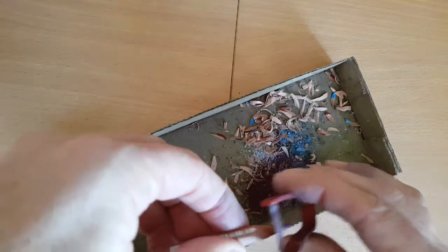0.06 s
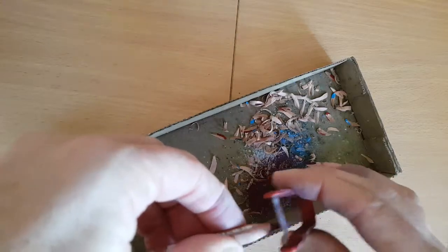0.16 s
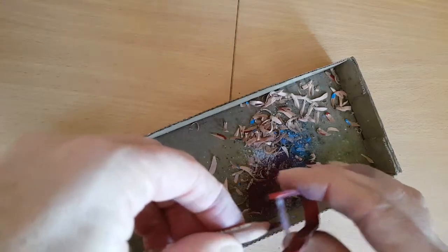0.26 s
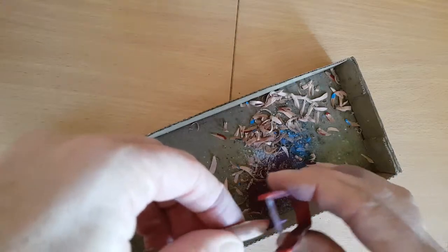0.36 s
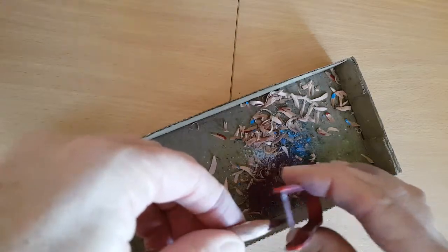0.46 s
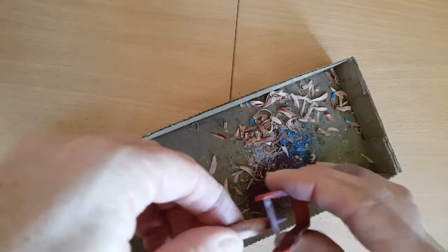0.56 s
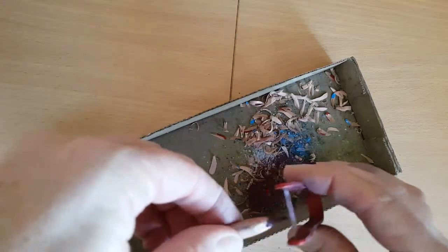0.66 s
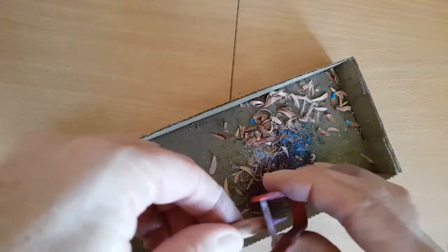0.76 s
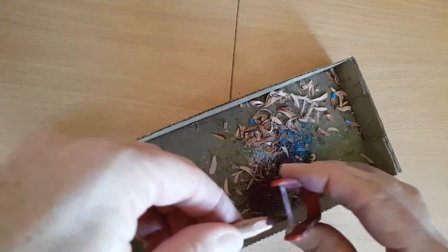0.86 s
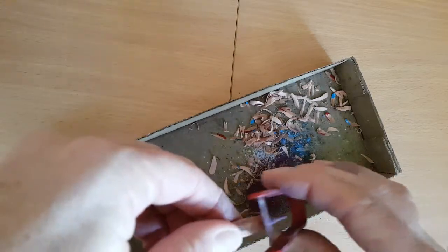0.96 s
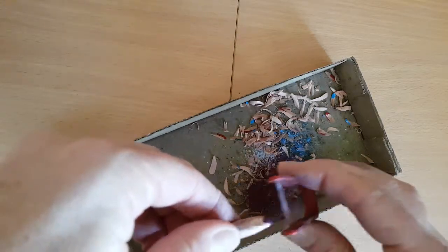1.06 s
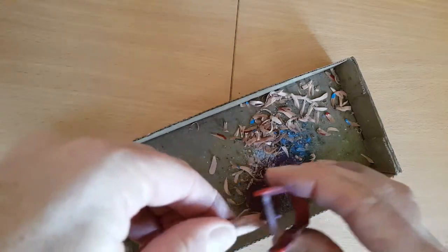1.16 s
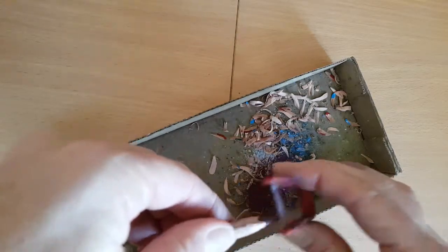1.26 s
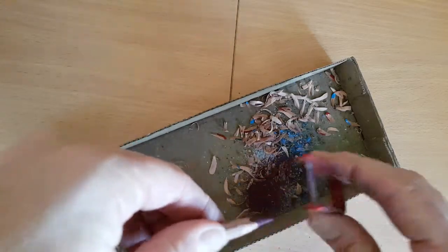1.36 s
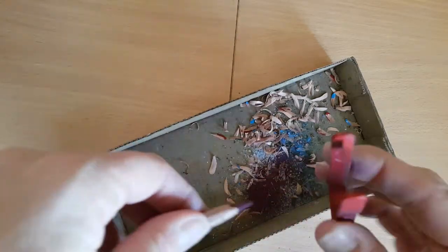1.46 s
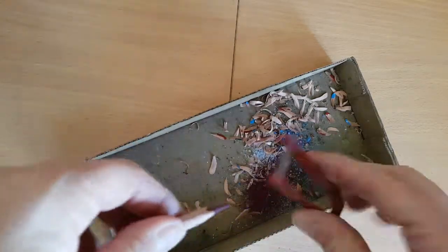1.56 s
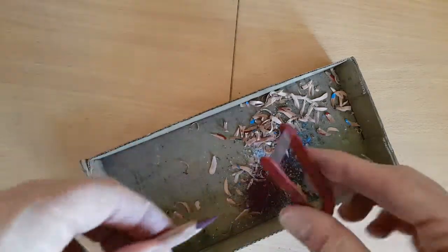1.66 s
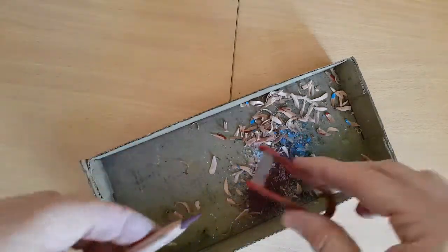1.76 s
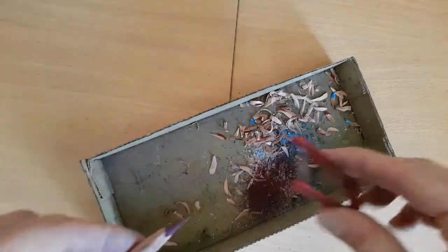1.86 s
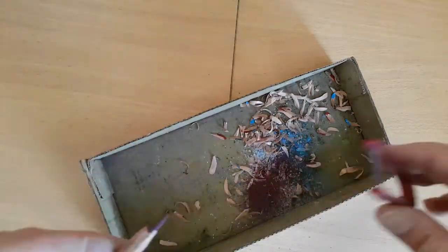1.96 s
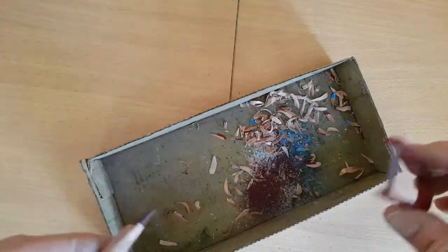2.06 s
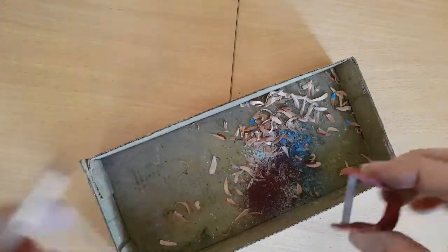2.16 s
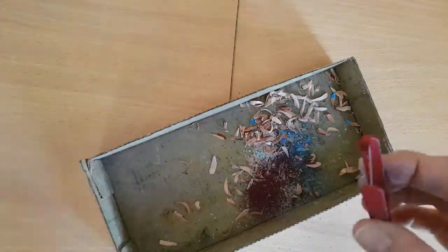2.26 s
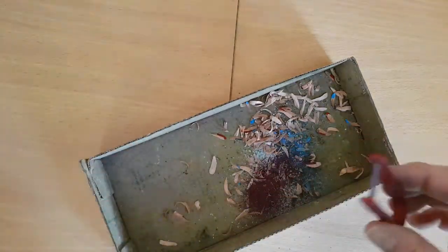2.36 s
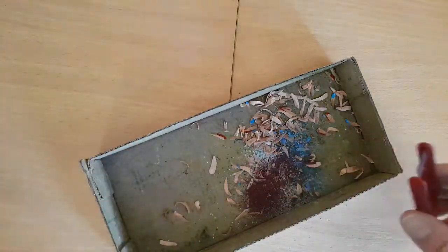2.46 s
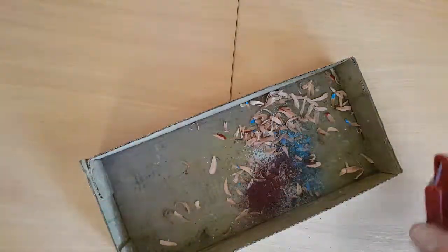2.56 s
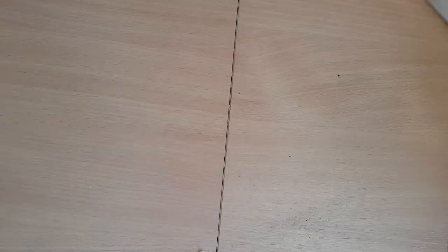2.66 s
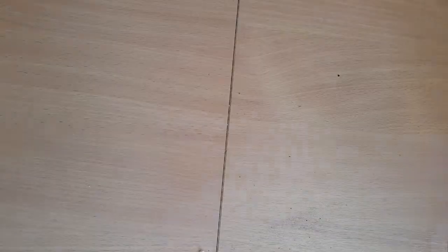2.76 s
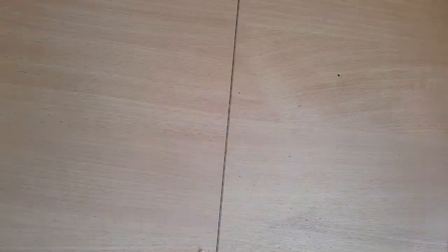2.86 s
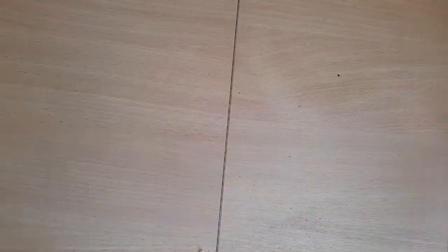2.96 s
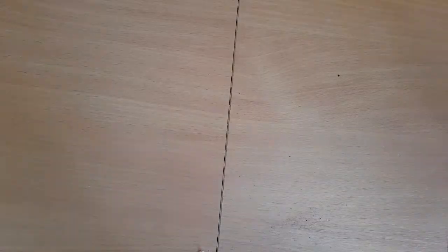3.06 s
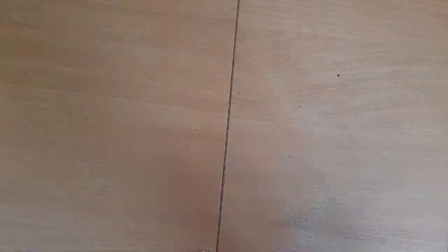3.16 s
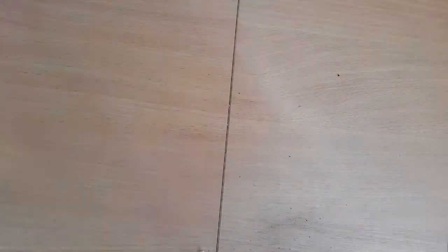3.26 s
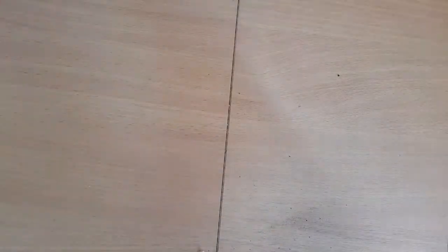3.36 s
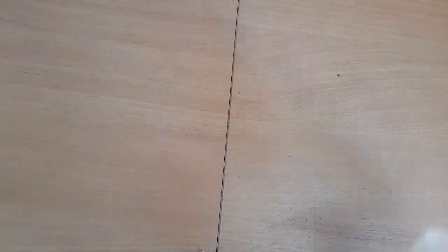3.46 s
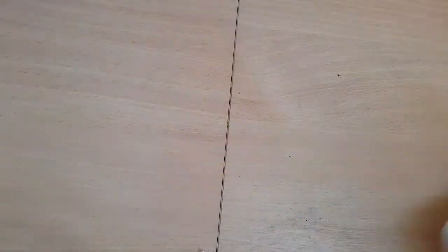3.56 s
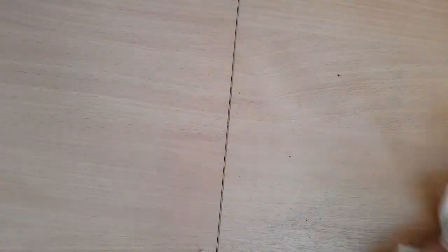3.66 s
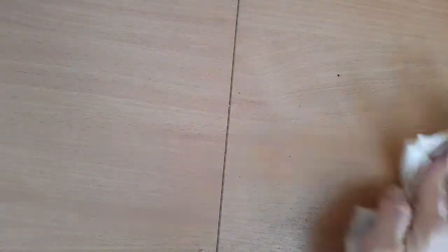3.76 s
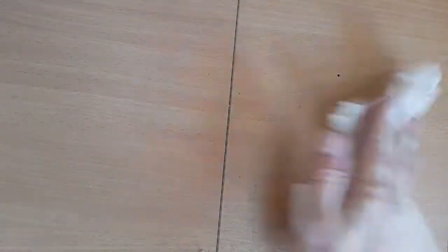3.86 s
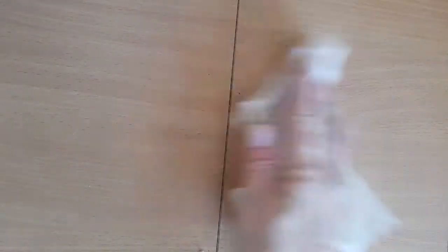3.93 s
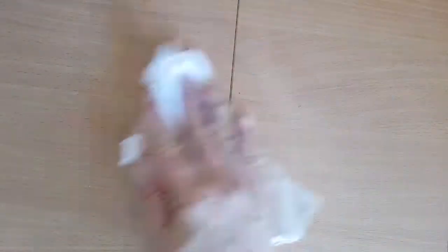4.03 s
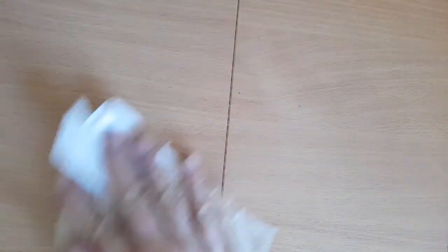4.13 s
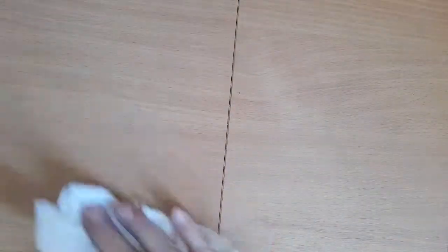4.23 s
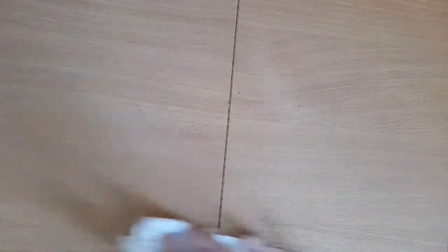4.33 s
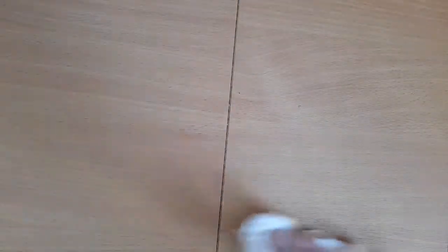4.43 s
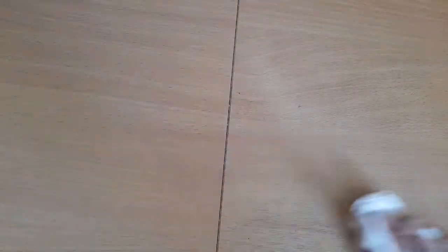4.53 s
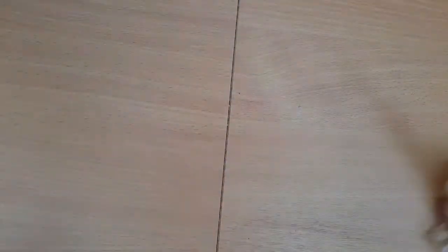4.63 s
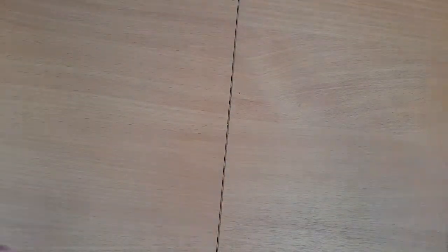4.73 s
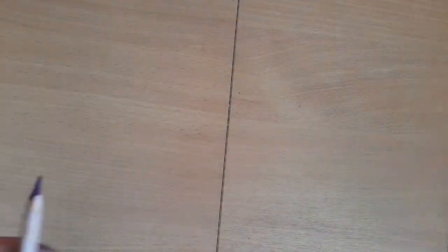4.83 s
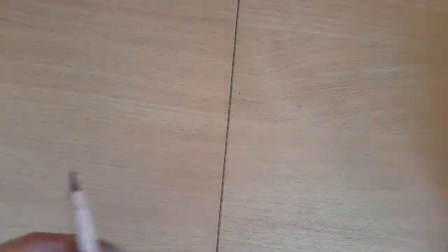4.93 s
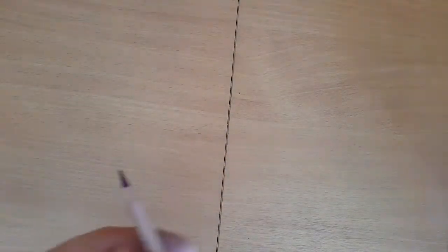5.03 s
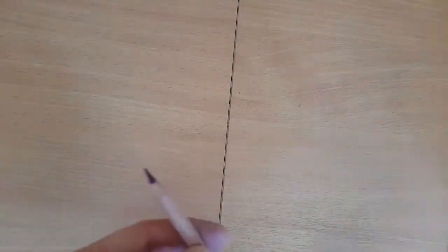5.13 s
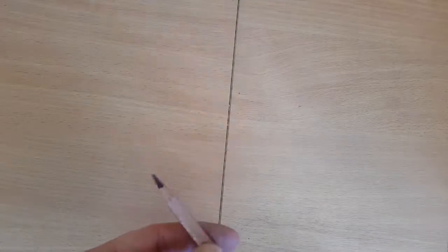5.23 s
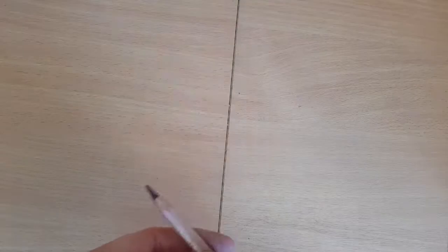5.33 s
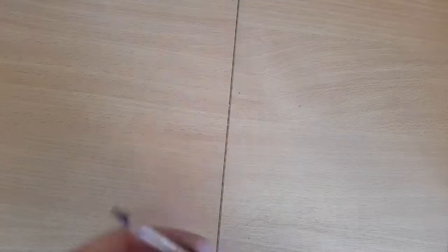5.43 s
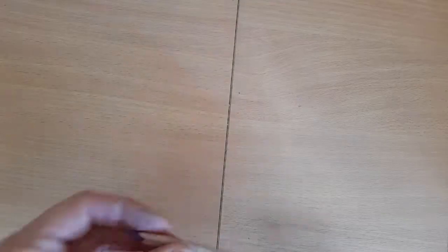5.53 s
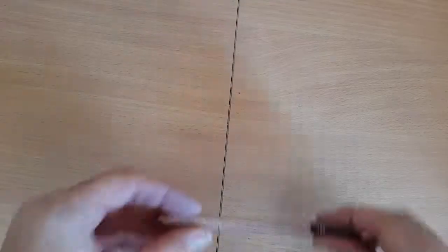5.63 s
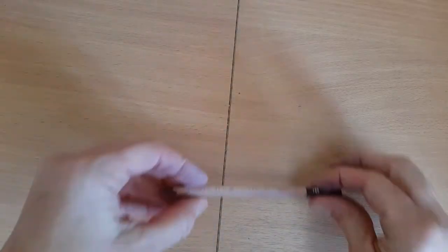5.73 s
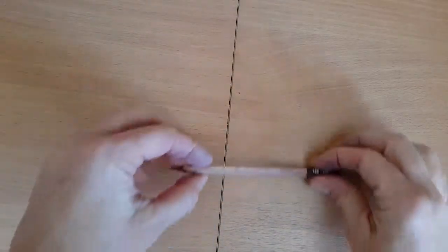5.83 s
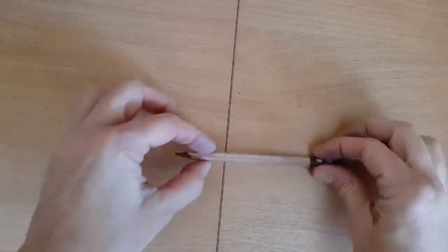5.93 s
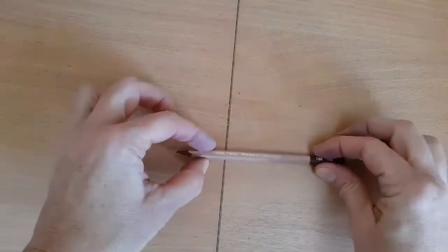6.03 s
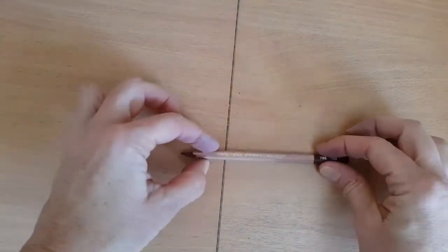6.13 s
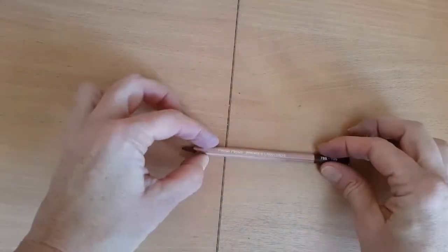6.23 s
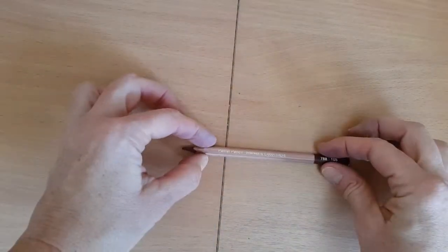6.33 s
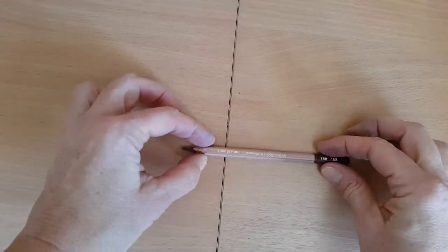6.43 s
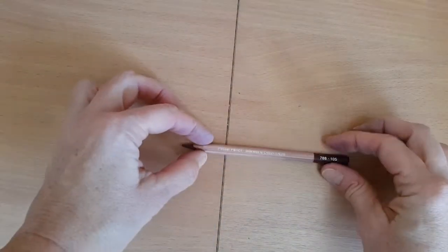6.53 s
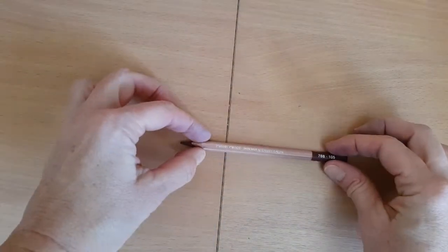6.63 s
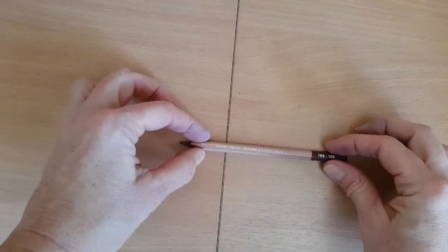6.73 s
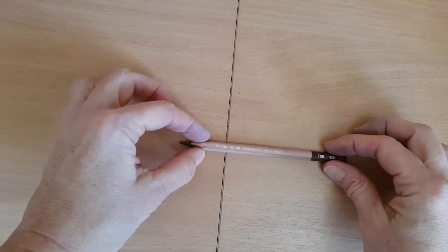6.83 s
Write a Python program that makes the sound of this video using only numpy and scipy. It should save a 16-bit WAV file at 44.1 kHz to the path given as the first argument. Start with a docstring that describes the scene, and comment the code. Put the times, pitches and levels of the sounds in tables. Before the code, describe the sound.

Close up in a small quiet room, a hand-held sharpener makes seven short, bright, rasping strokes on a pencil in a steady rhythm. After a pause, objects slide and click aside, the table is bumped, and a hand with paper tissue rubs across the wood in a loud rushing hiss. Finally the pencil slides faintly and taps the table. A low appliance hum stays underneath.

```python
"""A small quiet room with a wooden table: a hand-held blade scrapes a pencil point in seven quick strokes.
The tools are put aside, a hand drags across the table and wipes it with a paper tissue,
then the pencil is laid down with a light tap. Some appliance hums low throughout.
Rubbing is unevenly pulsing noise, contacts are noise that starts suddenly and dies away;
both are coloured by resonances of blade, pencil and table, and the room adds a short tail."""
import sys
import numpy as np
from scipy import signal
from scipy.fft import rfft, irfft, next_fast_len
from scipy.io import wavfile

SR = 44100
rng = np.random.default_rng(int(sys.argv[2]) if len(sys.argv) > 2 else 0)


def put_to_file(sound):
    """Save the sound as 16-bit audio at rate SR, in the file named by the first command-line argument."""
    columns = np.atleast_2d(sound).T  # one column per channel
    safe = np.clip(columns, -1, 1)
    whole_steps = np.round(safe * 32767)
    wavfile.write(sys.argv[1], SR, whole_steps.astype(np.int16))


N = 303834
T = np.arange(N) / SR  # time in seconds
FFT_SIZE = 2 * next_fast_len(N // 2 + 8192)
HZ = np.maximum(np.fft.rfftfreq(FFT_SIZE, 1 / SR), 1)

# All dB columns of colours and resonances are relative, within their own table.
# appliance hum lines: [f/Hz, early level/dB, late level/dB, random waver (steady part = 1)]
HUM_LINES = [(48.8, -78, -77, .8), (90.8, -66, -66.5, 0.3), (119, -73.5, -66, 0.05), (167.6, -79, -77, 0.9),
             (189.2, -82.5, -74, 0.5)]
# the hum moves from its early to its late level between these two times: [t/s]
HUM_CHANGE_S = [3.4, 3.8]
# colour of the steady room noise: [f/Hz, level/dB]
ROOM_NOISE_COLOUR = [(20, -8.5), (45, -8), (90, -3), (180, -11), (260, -14.5), (350, -25), (600, -23.5),
                     (1200, -30.5), (2500, -31), (5000, -34), (9000, -36), (11500, -30), (15000, -32)]
# likeness of the two sides: [f/Hz, likeness -1 to 1]
SIDE_LIKENESS = [(60, 0.99), (130, 0.64), (300, 0.67), (700, 0.6), (1400, 0.18), (2600, -0.079),
                 (6000, 0.029), (15000, 0.03)]
# blade strokes: [blade lands t/s, cut length/s, level/dB, landing tick level/dB,
# grip from 0 = far from the point to 1 = close to it]
BLADE_STROKES = [(-0.05, 0.068, -37.5, -60, 0.091), (0.174, 0.075, -38.5, -51, 0.12),
                 (0.395, 0.067, -37.5, -52.5, 0.022), (0.609, 0.061, -40, -53, 0.1),
                 (0.823, 0.071, -37.5, -57, 0.9), (1.043, .068, -37, -52.5, 0.98),
                 (1.272, 0.055, -40.5, -84, 0.99)]
# colour of the scraping: [f/Hz, level/dB]
SCRAPE_COLOUR = [(400, -41), (700, -30), (1000, -6), (1350, -17.5), (1900, -5.5), (2800, -5), (4100, -2.5),
                 (5100, -4), (6300, -2), (8000, -1), (10000, -5), (12500, -2), (15000, -6.5)]
# resonances of pencil and blade, the pencil's two flexing ones first: [f/Hz, width/Hz, level/dB]
BLADE_MODES = [(949, 86, 5), (1940, 180, -4), (2296, 134, 10.5), (3250, 150, 0), (4150, 150, 3),
               (6180, 290, 0.5), (6500, 140, -1.5), (7650, 74, -10), (8330, 190, -1), (11240, 250, -4)]
# colour of the blade landing: [f/Hz, level/dB]
LANDING_COLOUR = [(1500, -11), (3500, -11), (5200, -5), (7200, 2), (9500, -12), (11500, -4), (12800, 9),
                  (14500, -6), (16000, -26)]
# one stroke leaves the blade ringing: [t/s, level/dB, f/Hz, time to fall 60 dB/s]
FREE_BLADE_RING = (0.897, -65, 6000, .29)
# things pushed aside, the pencil sliding through the fingers:
# [start t/s, speeding up/s, coasting/s, relative level/dB, brightness/dB per octave]
SLIDE_EVENTS = [(2.41, 0.035, 0.065, -63.5, 1.5), (2.63, 0.057, 0.0079, -48, -1.5),
                (2.724, 0.0097, 0.23, -42, 0), (3.008, 0.051, 0.13, -52.5, -1.5),
                (5.47, .1, 0.2, -64.5, 11), (5.76, 0.079, 0.13, -66, 7), (6.62, .1, .16, -69, 8)]
# colour of the sliding: [f/Hz, level/dB]
SLIDE_COLOUR = [(200, -15), (380, -9.5), (600, -8), (1000, -8), (1500, -2.5), (2400, -0.5), (3600, 3.5),
                (5500, -2.5), (8500, -4), (11500, -9), (15000, -14)]
# resonances of the sliding things: [f/Hz, width/Hz, level/dB]
SLIDE_MODES = [(555, 55, 6.5), (820, 80, 6), (1310, 130, -5), (3500, 730, -14.5)]
# the pencil taps against things: [t/s, level/dB]
PENCIL_TAPS = [(2.5, -57), (5.673, -50), (5.925, -61), (6.295, -49.5)]
# ring of the tapped pencil: [f/Hz, half the width given to each of two passes/Hz, level/dB]
PENCIL_MODES = [(1240, 170, -1.5), (1620, 130, 5.5), (1980, 130, 1)]
# knocks on the table top: [t/s, relative level/dB, hardness as the low-pass limit f/Hz]
TABLE_KNOCKS = [(2.503, -54, 700), (2.692, -46, 1500), (3.281, -39.5, 900), (3.319, -42, 2000),
                (3.357, -44.5, 2000), (3.425, -42, 1800), (3.776, -39.5, 2500), (4.045, -53, 3000),
                (5.672, -63, 2500), (6.293, -41, 2200), (6.315, -57, 1800), (6.598, -59, 1200)]
# resonances of the table top: [f/Hz, width/Hz, level/dB]
TABLE_MODES = [(190, 27, -8), (275, 15, 1.5), (339.4, 15, -10), (409, 19.5, -7), (503, 31, -11.5),
               (577, 11.6, -4.5), (655.3, 14, -1), (710, 16.8, 1.5), (767, 12.3, 4), (817, 53, -0.5),
               (871, 37, 0.5), (986, 42, -1.5), (1115, 37, -4), (1238, 18, -4), (1298, 21.8, -8),
               (1449, 12, -2), (1573, 23, -8), (1847, 11, -7)]
# colour of the short clack of a knock: [f/Hz, level/dB]
CLACK_COLOUR = [(88, -43), (150, -2.5), (280, 1), (380, -15), (602, 1.5), (858, 2), (1070, -16), (1260, 8),
                (1380, -9), (2040, -22), (6000, -26), (7800, -66), (13200, -120)]
# the hand's weight bumps the table: [t/s, starting peak level/dB]
WEIGHT_BUMPS = [(2.682, -49), (3.256, -47), (3.319, -43), (3.715, -34.5), (4.221, -40)]
# sharp clicks of handled things: [t/s, level/dB, f/Hz, width of each of two passes/Hz, time to fall 60 dB/s]
SHARP_CLICKS = [(2.677, -47, 4000, 9000, 0.04), (2.6926, -35, 5770, 14000, 0.011),
                (2.756, -28, 3600, 2400, 0.022), (2.953, -53, 8000, 11000, .03),
                (3.239, -44.5, 5000, 8000, 0.063), (3.8031, -17.5, 6600, 2800, 0.0045),
                (4.038, -42, 1530, 3500, .12), (4.936, -56, 6000, 6000, .025),
                (4.957, -50.5, 5100, 9000, 0.093), (5.643, -57.5, 7140, 8000, .02),
                (6.634, -64, 3850, 1200, 0.029), (6.796, -63, 12100, 6000, .03)]
# the wad is pressed down, then swept across:
# [t/s, speed as relative level of the hiss/dB, pressure as relative level of the hand's drag/dB]
WAD_PRESS = [(3.2, -66.5, -70.5), (3.252, -64.5, -53), (3.33, -57.5, -45), (3.388, -49, -52),
             (3.42, -49, -45), (3.564, -53.5, -57), (3.694, -48.5, -46.5), (3.79, -40.5, -51)]
WAD_SWEEP = [(3.83, -43, -57), (4.006, -45, -71.5), (4.042, -41.5, -63.5), (4.638, -40.5, -78),
             (4.698, -40, -63.5), (4.742, -39.5, -87), (4.832, -50, -66), (5.12, -81.5, -83)]
# colours of the hand's drag, the wad's scuff and the paper's hiss: [f/Hz, level/dB]
DRAG_COLOUR = [(65, -35.5), (110, 5), (140, -4), (200, 2), (290, -8), (344, -2), (472, -6), (647, 7),
               (815, -4), (1130, -21), (1230, -20), (1690, -22), (2000, -5), (2600, -35), (4400, -120)]
SCUFF_COLOUR = [(560, -33), (950, -5), (1130, -6), (1200, -0.5), (1500, -3), (1720, -4), (1880, -1),
                (2040, -3.5), (4350, -3.5), (5530, -10), (6500, -11), (8450, -27), (14300, -120)]
HISS_COLOUR = [(1000, -27.5), (2200, -7.5), (3500, -3), (5000, -1), (7000, -1), (9000, -0.5), (10800, 1),
               (13000, 0.5), (15000, -4)]
# brief stick-slip rubs of wad, skin and pencil: [t/s of the middle, level/dB, f/Hz, spread of the swell/s]
SHORT_RUBS = [(3.289, -46.5, 820, 0.009), (3.712, -44.5, 1670, .014), (3.775, -36.5, 1360, 0.0091),
              (3.81, -37, 1480, 0.016), (4.2, -52, 1500, .05), (4.99, -61.5, 3000, 0.023),
              (6.636, -66, 606, 0.046)]

ROOM_NOISE_DB = -65.5
ROOM_T60_S = 0.21  # time for the tail to fall 60 dB
SETTLE_S = 0.033  # the blade gets moving over this time
# a cut swells, holds at full depth, and dies as the blade runs off
BITE_DB_PER_S, FULL_BITE_S, RUN_OFF_DB_PER_S = 442, 0.0095, 856
# extra strength of the pencil's two flexing modes at either end of the grip's range
FLEX_FAR_DB, FLEX_CLOSE_DB = np.array([-2, 13.5]), np.array([8, -15])
COAST_DB_PER_S, STOP_DB_PER_S = 34.5, 290  # a slide slows gently, then stops
CRINKLES_PER_S = 60  # tiny snaps in paper and in sliding things
RUB_WIDTH = 0.31  # width of each of two passes, as a share of the pitch
CUTOFF_HZ = 15900


def from_db(db):
    """Turn decibels into a gain."""
    return np.exp(np.asarray(db) * (np.log(10) / 20))


def rms_one(x):
    """Scale a signal to an average strength (rms) of 1."""
    return x / np.sqrt(np.mean(x ** 2) + 1e-20)


def at_hz(points):
    """Read a table at every frequency, in straight lines along log frequency."""
    hz, value = np.transpose(points)
    return np.interp(np.log(HZ), np.log(hz), value)


def filtered(x, response):
    """Pass a sound through a frequency response."""
    return irfft(rfft(x, FFT_SIZE) * response)[..., :N]


def unit(response):
    """Scale a response so that white noise keeps its level."""
    return response / np.sqrt(np.mean(np.abs(response) ** 2))


def colour(points):
    """Make a filter from a spectrum table that reacts at once (minimum phase) and keeps white noise's level."""
    cepstrum = irfft(np.log(from_db(at_hz(points))))
    # folding the second half onto the first leaves nothing ahead of time zero
    cepstrum[1:len(HZ) - 1] *= 2
    cepstrum[len(HZ):] = 0
    return unit(np.exp(rfft(cepstrum)))


def resonance(hz, width_hz):
    """Response of one resonance, 1 on top."""
    return 1 / (1 + 1j * (HZ ** 2 - hz ** 2) / (HZ * width_hz))


def drift(rate):
    """Random wandering with spread 1, with this many new random points a second."""
    knots = rng.standard_normal(int(N / SR * rate) + 2)
    return rms_one(np.interp(T * rate, np.arange(len(knots)), knots))


def noise():
    """White stereo noise: alike on both sides in the bass, nearly unrelated in the treble."""
    alike = np.clip(at_hz(SIDE_LIKENESS), -.99, .99)
    mid, side = filtered(rng.standard_normal((2, N)), np.sqrt([1 + alike, 1 - alike]))
    return np.array([mid + side, mid - side]) / np.sqrt(2)


def friction(slips_per_s, rough_db):
    """Rubbing force: a rush of tiny slips of uneven size."""
    return rms_one(noise() * from_db(rough_db * drift(slips_per_s)))


def burst(s, t60):
    """Loudness shape of a contact: sudden start, then an even fall in dB."""
    return (T >= s) * from_db(-60 * np.clip((T - s) / t60, 0, 3))


def background():
    """Steady room noise and a hum whose lines waver in strength and phase."""
    hum = 0
    for hz, early_db, late_db, waver in HUM_LINES:
        wandering = drift(12) + 1j * drift(12)
        phasor = (1 + waver * wandering) / np.sqrt(1 + 2 * waver ** 2)
        gain = from_db(np.interp(T, HUM_CHANGE_S, [early_db, late_db]))
        hum = hum + np.sqrt(2) * gain * np.real(phasor * np.exp(2j * np.pi * hz * T))
    return hum + from_db(ROOM_NOISE_DB) * filtered(noise(), colour(ROOM_NOISE_COLOUR))


def cut_pressure(s, length, db):
    """Force of one stroke: the blade gets moving, bites deeper, holds, and runs off the point."""
    past_end = T - s - length
    bite_db = BITE_DB_PER_S * np.minimum(past_end + FULL_BITE_S, 0)
    depth_db = bite_db - RUN_OFF_DB_PER_S * np.maximum(past_end, 0)
    moving = np.clip((T - s) / SETTLE_S, 0, 1) ** 2
    return moving * from_db(db + np.maximum(depth_db, -200))


def stroke_body(scrape, grip, wander=0.018, grip_db=1.5, close_flat=0.047, bright_db=0.63, close_bright_db=0.5):
    """Resonances of one stroke: a closer grip lowers the first flexing mode and brightens the sound."""
    chance = rng.standard_normal((2, len(BLADE_MODES)))
    detune, strength_db = 1 + wander * chance[0], grip_db * chance[1]
    detune[0] = 1 + close_flat * (.5 - grip)
    strength_db[:2] = (1 - grip) * FLEX_FAR_DB + grip * FLEX_CLOSE_DB
    modes = 0
    for k, (hz, width_hz, db) in enumerate(BLADE_MODES):
        modes = modes + from_db(db + strength_db[k]) * resonance(hz * detune[k], width_hz)
    tilt_db_per_octave = bright_db + close_bright_db * grip
    return unit(scrape * (1 + modes) * from_db(tilt_db_per_octave * np.log2(HZ)))


def sharpening(chatter_db=1.5, hollow_db=-3, left_db=1.1, touch_t60=0.039):
    """Each stroke is rough rubbing that makes blade and pencil ring, with a tick as the blade lands."""
    slips = friction(slips_per_s=1600, rough_db=1.5) * from_db(chatter_db * drift(220))
    scrape = colour(SCRAPE_COLOUR) * from_db(hollow_db * abs(resonance(2180, 630)))  # a dip near 2180 Hz
    out, ticks = 0, 0
    for s, length, db, tick_db, grip in BLADE_STROKES:
        out = out + filtered(cut_pressure(s, length, db) * slips, stroke_body(scrape, grip))
        ticks = ticks + from_db(tick_db) * burst(s, touch_t60)
    left_lean = from_db(left_db * np.array([[1], [-1]]) / 2)
    return left_lean * out + filtered(noise() * ticks, colour(LANDING_COLOUR))


def blade_ring():
    """The freed blade sings faintly: one fading sine."""
    s, db, hz, t60 = FREE_BLADE_RING
    return from_db(db) * burst(s, t60) * np.sqrt(2) * np.sin(2 * np.pi * hz * T)


def push(s, rise_s, coast_s):
    """Speed of one slide: it picks up, coasts and stops."""
    since_top = T - s - rise_s
    coast_loss_db = COAST_DB_PER_S * np.maximum(since_top, 0)
    stop_loss_db = STOP_DB_PER_S * np.clip(since_top - coast_s, 0, 1)
    return np.clip((T - s) / rise_s, 0, 1) ** 2 * from_db(-coast_loss_db - stop_loss_db)


def crinkles(size_db=2.5, t60=0.006):
    """Sparse tiny snaps of uneven size, each a quickly fading puff of noise."""
    sizes = from_db(size_db * np.minimum(rng.exponential(1, N), 2.5))
    snaps = (rng.random(N) < CRINKLES_PER_S / SR) * sizes
    # the 1e-18 keeps the filter away from extremely small numbers
    return noise() * signal.lfilter([1], [1, -from_db(-60 / (t60 * SR))], snaps + 1e-18)


def sliding(slide_db=-3, right_db=1.0, peaks_db=-3, shine_db=6.0, crackle_db=-4):
    """Light things slide with a dry, grainy hiss; its fine treble grows faster than the speed."""
    aside = from_db(right_db * np.array([[-1], [1]]) * (HZ / 8000 - 1.0))  # leans right above 8 kHz, left below
    peaks = sum(from_db(db + peaks_db) * resonance(hz, width_hz) for hz, width_hz, db in SLIDE_MODES)
    body = colour(SLIDE_COLOUR) * (1 + peaks)
    slips = friction(slips_per_s=700, rough_db=2.5) + from_db(crackle_db) * crinkles()
    out, all_speed = 0, 0
    for s, rise_s, coast_s, db, bright_db in SLIDE_EVENTS:
        speed = from_db(db) * push(s, rise_s, coast_s)
        bright_body = unit(body * from_db(bright_db * np.log2(HZ)))
        out = out + filtered(speed * slips, bright_body * aside)
        all_speed = all_speed + speed
    fine = from_db(shine_db) * all_speed * np.sqrt(all_speed / all_speed.max()) * noise()
    return from_db(slide_db) * (out + filtered(fine, resonance(11200, 7700) ** 2 * aside))


def taps(contact_t60=0.024):
    """The pencil rings briefly at every tap."""
    force = noise() * sum(from_db(db) * burst(s, contact_t60) for s, db in PENCIL_TAPS)
    ring = sum(from_db(db) * resonance(hz, 2 * width_hz) ** 2 for hz, width_hz, db in PENCIL_MODES)
    return filtered(force, unit(ring))


def table_top():
    """The table's resonances with alternating signs, keeping white noise's level."""
    board = 0
    for k, (hz, width_hz, db) in enumerate(TABLE_MODES):
        board = board + (-1) ** k * from_db(db) * resonance(hz, width_hz)
    return unit(board)


def knocks(ring_db=-5, bump_hz=98, bump_t60=0.22):
    """Blows on the table: a short clack, the ringing board, and a low bump when weight lands on it."""
    crack = noise()
    force, bumps = 0, 0
    for s, db, hard_hz in TABLE_KNOCKS:
        softener = signal.butter(2, hard_hz, fs=SR, output="sos")  # softer contacts lose more treble
        force = force + from_db(db) * signal.sosfilt(softener, crack * burst(s, t60=0.07) + 1e-18)
    for s, db in WEIGHT_BUMPS:
        bumps = bumps + from_db(db) * burst(s, bump_t60) * np.sin(2 * np.pi * bump_hz * (T - s))
    return filtered(force, colour(CLACK_COLOUR) + from_db(ring_db) * table_top()) + bumps


def clicks():
    """Hard little contacts, each ringing briefly in its own range."""
    crack = noise()
    out = 0
    for s, db, hz, width_hz, t60 in SHARP_CLICKS:
        out = out + from_db(db) * filtered(crack * burst(s, t60), unit(resonance(hz, width_hz) ** 2))
    return out


def level(rows, column):
    """Gain over time from a dB column, faded in and out over 20 ms around its span."""
    rows = np.array(rows)
    start, end = rows[0, 0], rows[-1, 0]
    fade = np.interp(T, [start - .02, start, end, end + .02], [0, 1, 1, 0])
    return fade * from_db(np.interp(T, rows[:, 0], rows[:, column]))


def wiping(drag_db=-1.5, board_db=-1, scuff_db=6.0, scuff_ring_db=-9, hiss_db=4.5, judder_db=4.0,
           pressure_share=0.52, crinkle_db=-3):
    """Pressure makes the hand judder and the wood ring, speed makes paper hiss; the wad's scuff needs both."""
    board = table_top()
    judder = judder_db * drift(70)
    wipe = np.vstack([WAD_PRESS, WAD_SWEEP])
    speed, pressure = level(wipe, 1), level(wipe, 2)

    skin = from_db(judder) * friction(slips_per_s=430, rough_db=3.5)
    drag = filtered(pressure * skin, from_db(drag_db) * colour(DRAG_COLOUR) + from_db(board_db) * board)

    paper = from_db(judder / 2) * friction(slips_per_s=600, rough_db=2.0) + from_db(crinkle_db) * crinkles()
    effort = pressure ** pressure_share * speed ** (1 - pressure_share)
    scuff_body = colour(SCUFF_COLOUR) * (1 + from_db(scuff_ring_db) * board / 2)
    scuff = filtered(effort * paper, scuff_body)

    hiss = speed * filtered(friction(slips_per_s=1500, rough_db=1.2), colour(HISS_COLOUR))
    return drag + from_db(scuff_db) * scuff + from_db(hiss_db) * hiss


def rubs():
    """Brief stick-slip swells in a narrow band."""
    slips = friction(slips_per_s=420, rough_db=4.0)
    out = 0
    for s, db, hz, spread_s in SHORT_RUBS:
        swell = from_db(db) * np.exp(-((T - s) / spread_s) ** 2 / 2)
        out = out + filtered(slips * swell, unit(resonance(hz, RUB_WIDTH * hz) ** 2))
    return out


def room(x, wet_db, first_wall_s=.004):
    """Add the small room's fading noise-like tail, alike on both sides only in the bass."""
    tail = noise() * burst(first_wall_s, ROOM_T60_S)
    tail /= np.sqrt(np.sum(tail ** 2, axis=1)[:, None])
    return x + from_db(wet_db) * filtered(x, rfft(tail, FFT_SIZE))


def scene():
    """Close sources in the room, over its background."""
    strokes = room(sharpening() + blade_ring(), wet_db=-13.5)
    contacts = room(clicks() + taps() + knocks() + rubs(), wet_db=-8.0)
    rubbing = room(sliding() + wiping(), wet_db=-9.0)
    return strokes + contacts + rubbing + background()


def record(dry):
    """The top is cut steeply."""
    return filtered(dry, 1 / np.sqrt(1 + (HZ / CUTOFF_HZ) ** 900))


dry = scene()
out = record(dry)
put_to_file(out)
```